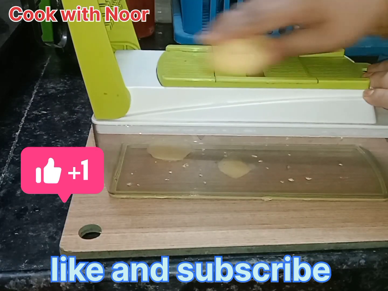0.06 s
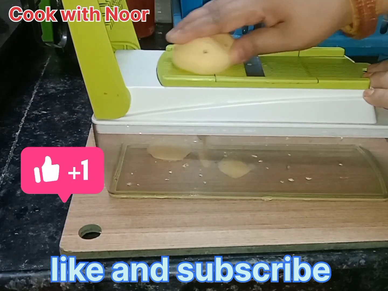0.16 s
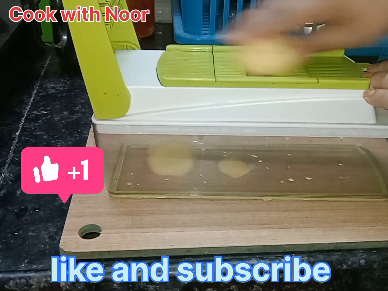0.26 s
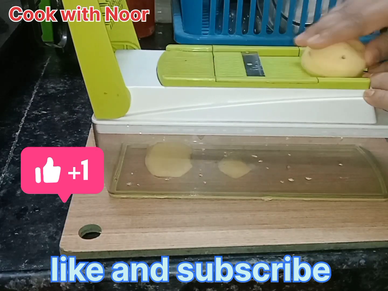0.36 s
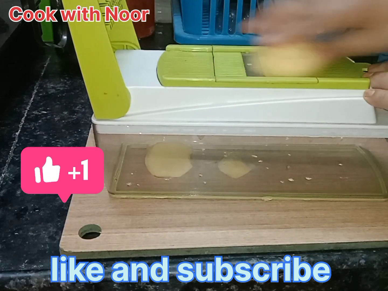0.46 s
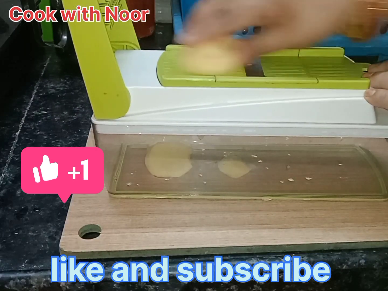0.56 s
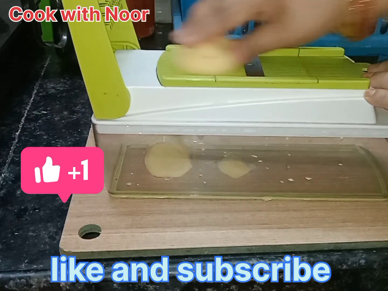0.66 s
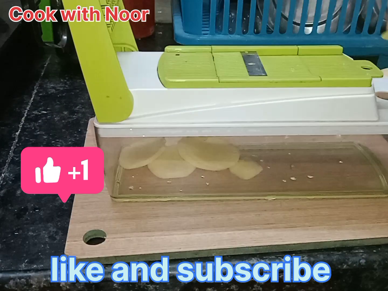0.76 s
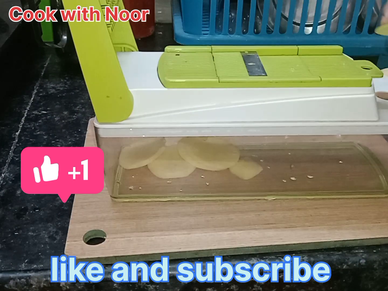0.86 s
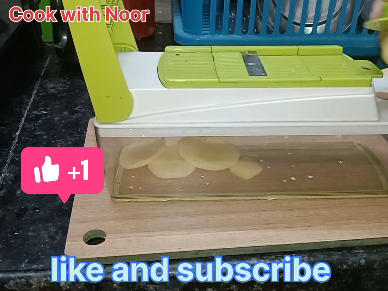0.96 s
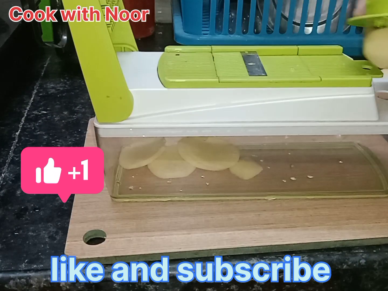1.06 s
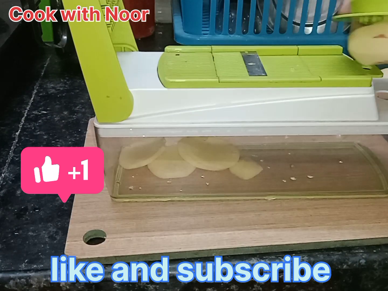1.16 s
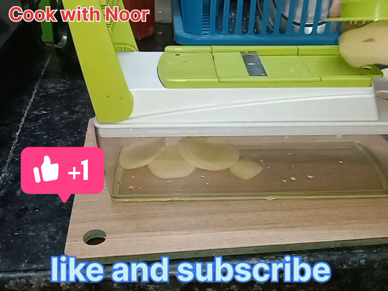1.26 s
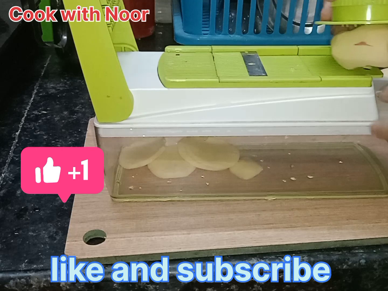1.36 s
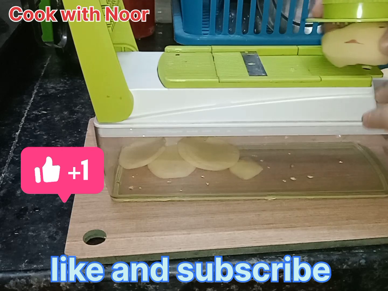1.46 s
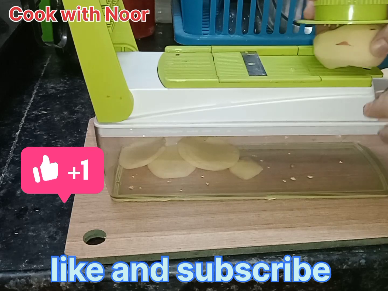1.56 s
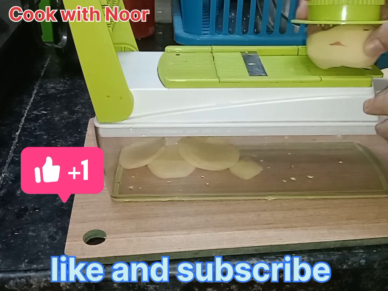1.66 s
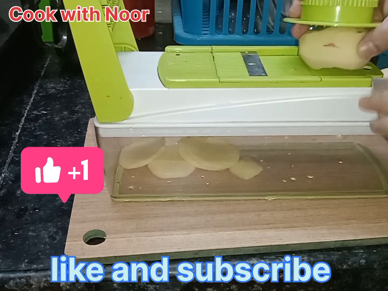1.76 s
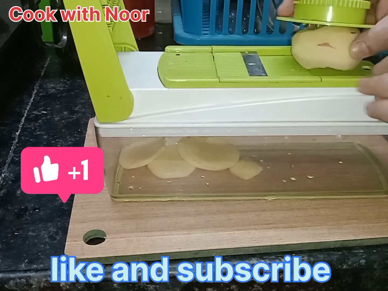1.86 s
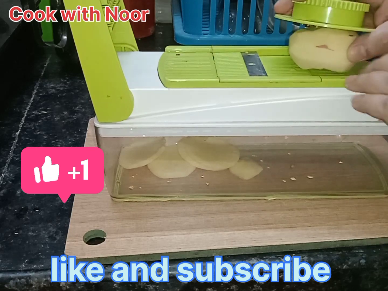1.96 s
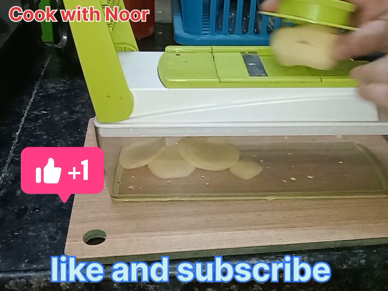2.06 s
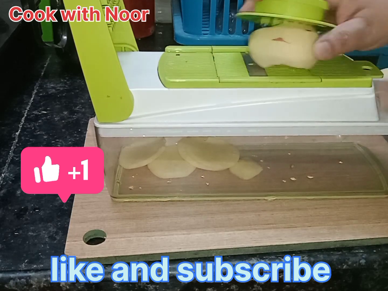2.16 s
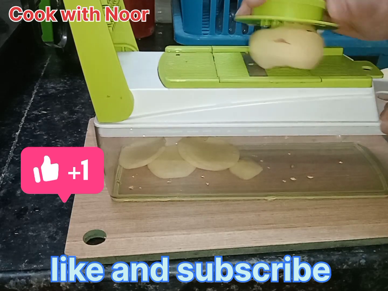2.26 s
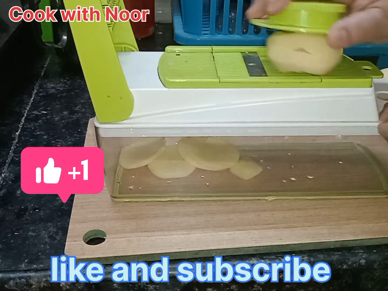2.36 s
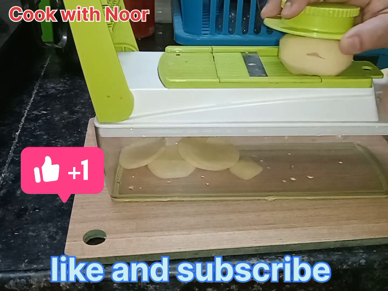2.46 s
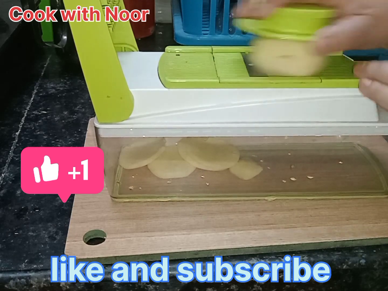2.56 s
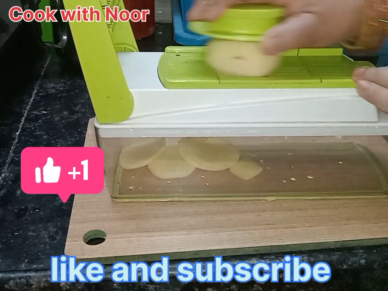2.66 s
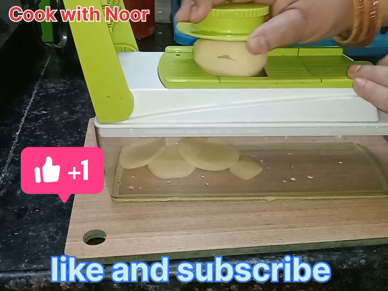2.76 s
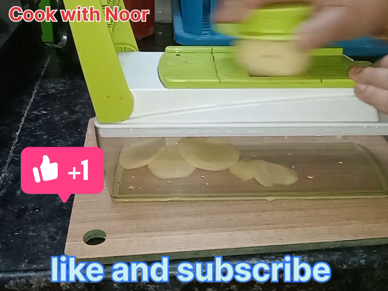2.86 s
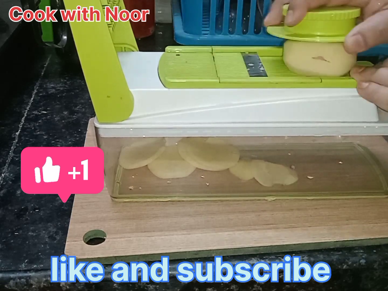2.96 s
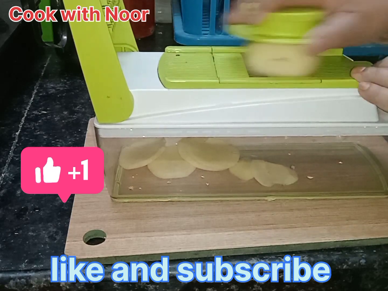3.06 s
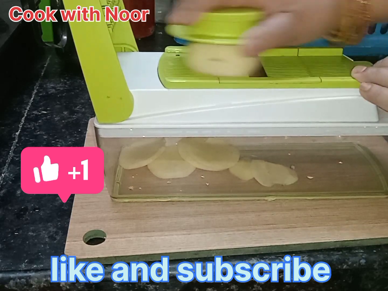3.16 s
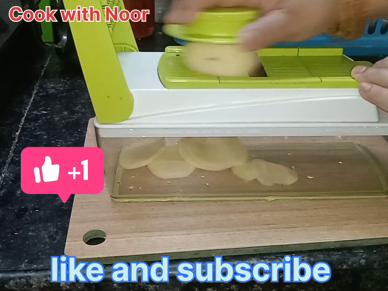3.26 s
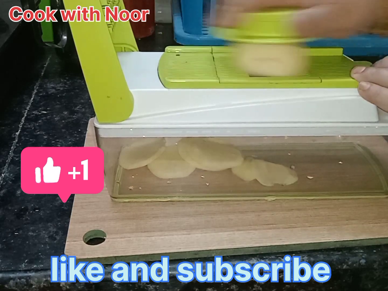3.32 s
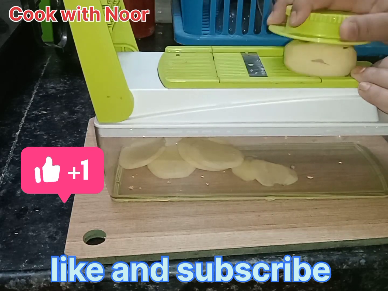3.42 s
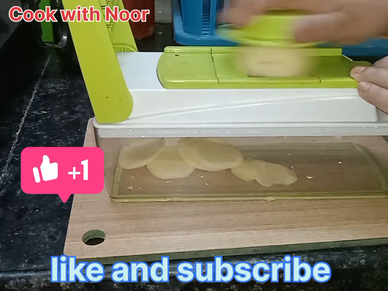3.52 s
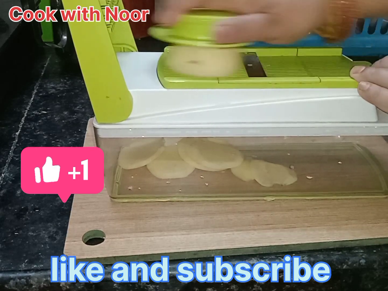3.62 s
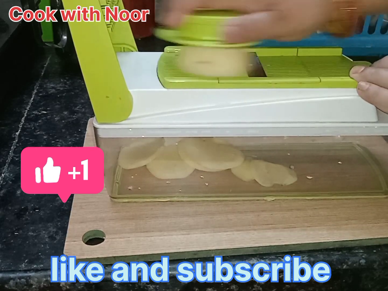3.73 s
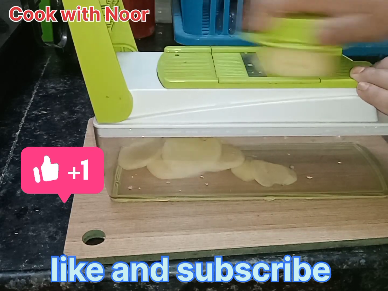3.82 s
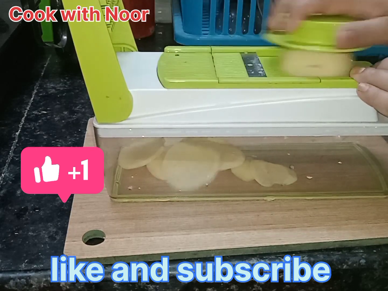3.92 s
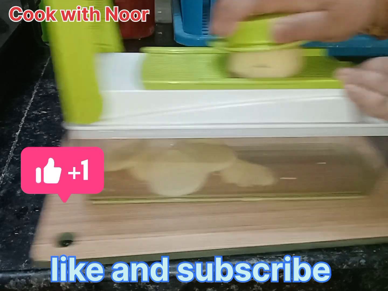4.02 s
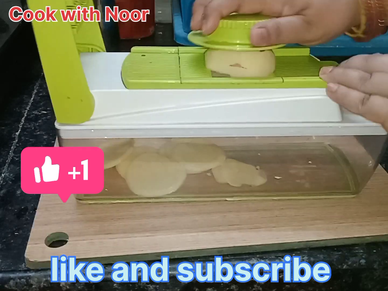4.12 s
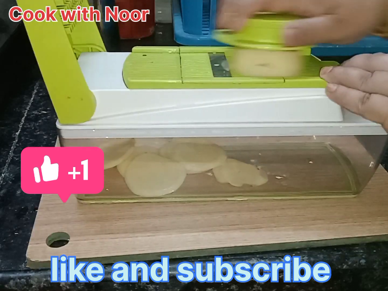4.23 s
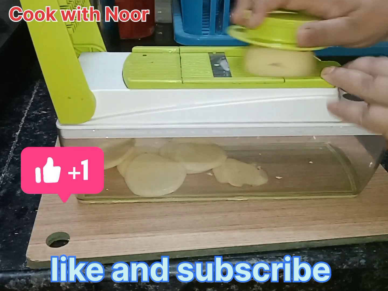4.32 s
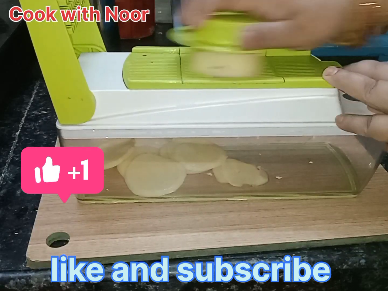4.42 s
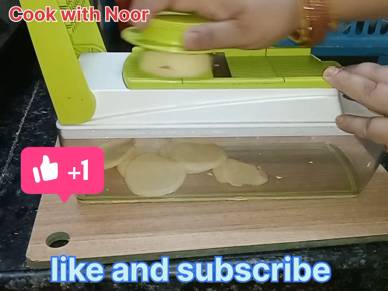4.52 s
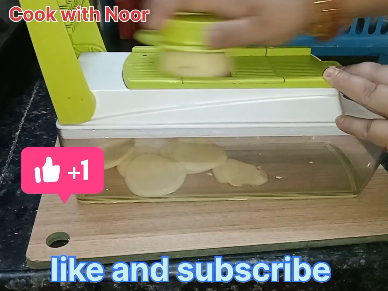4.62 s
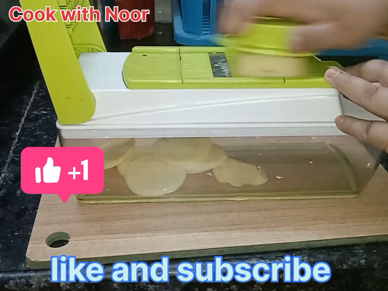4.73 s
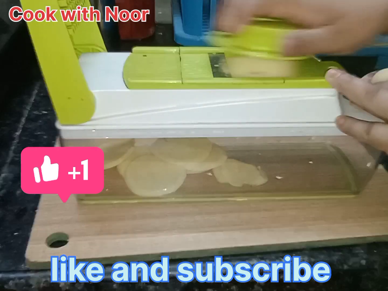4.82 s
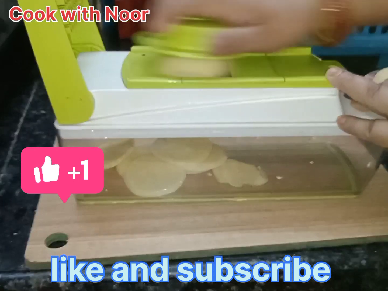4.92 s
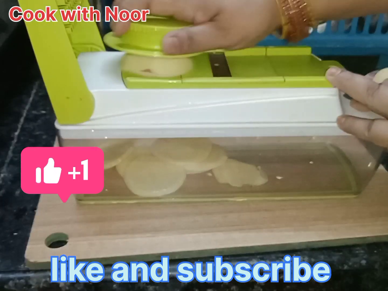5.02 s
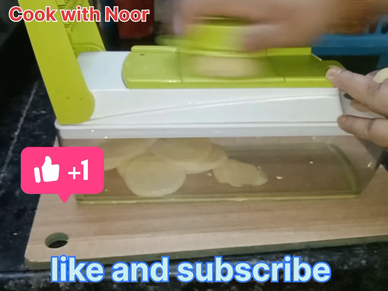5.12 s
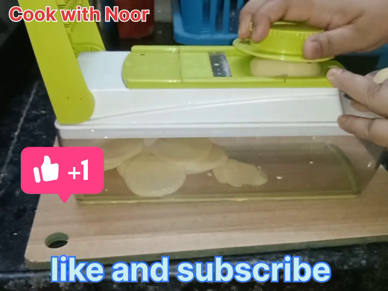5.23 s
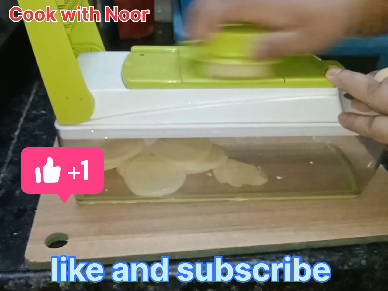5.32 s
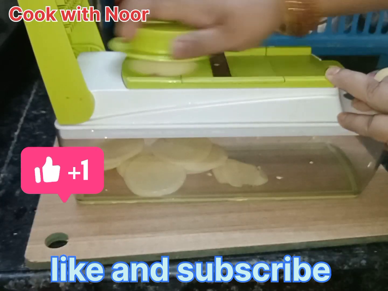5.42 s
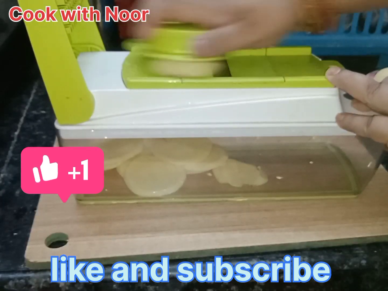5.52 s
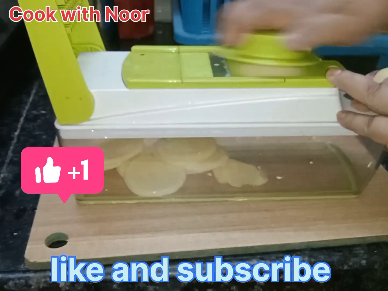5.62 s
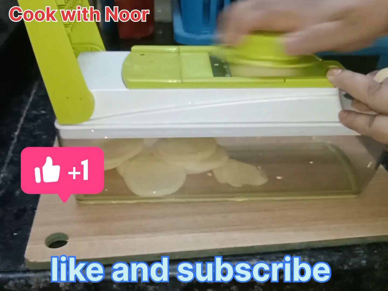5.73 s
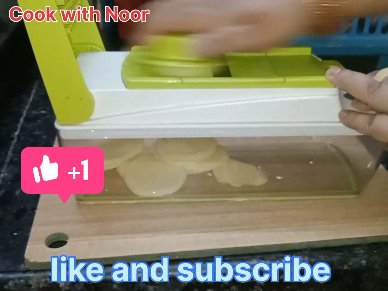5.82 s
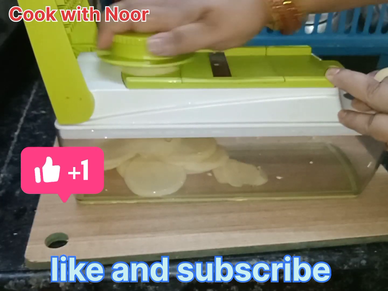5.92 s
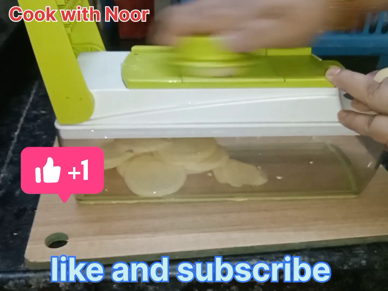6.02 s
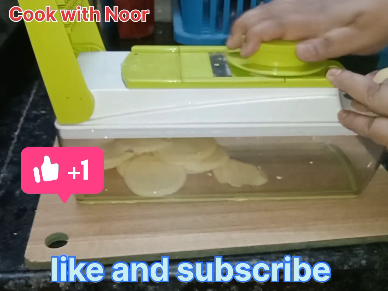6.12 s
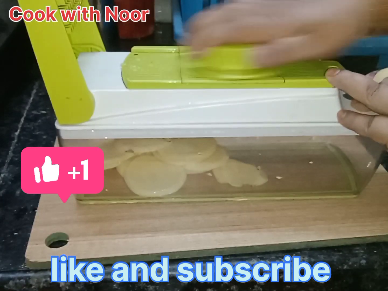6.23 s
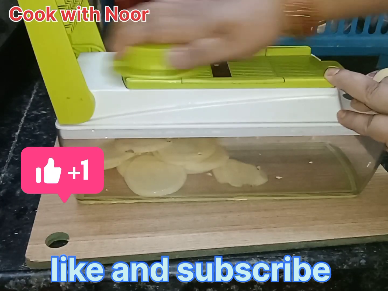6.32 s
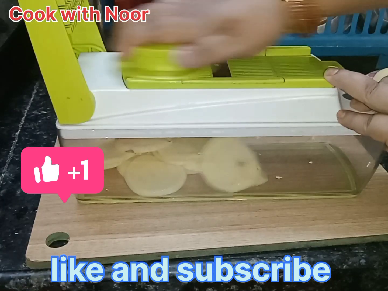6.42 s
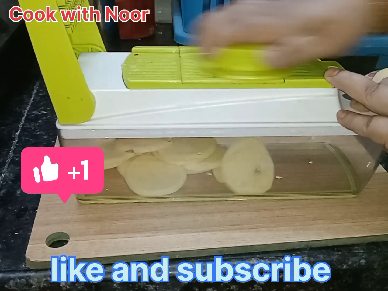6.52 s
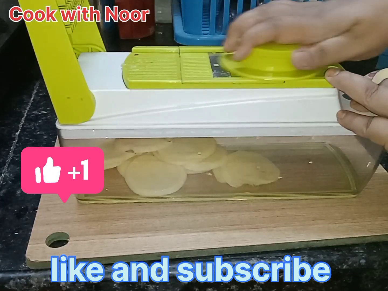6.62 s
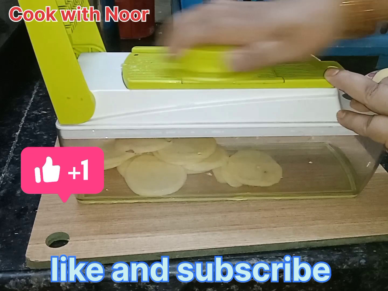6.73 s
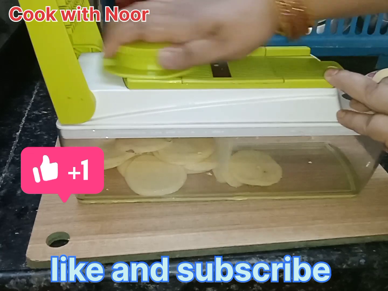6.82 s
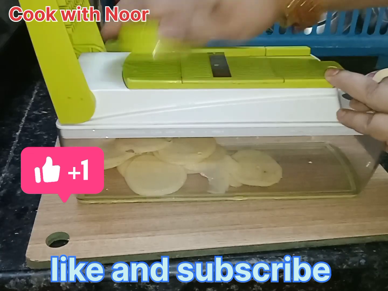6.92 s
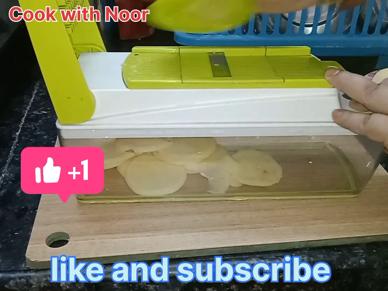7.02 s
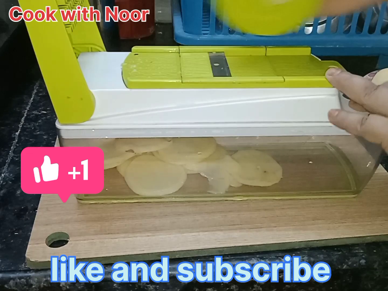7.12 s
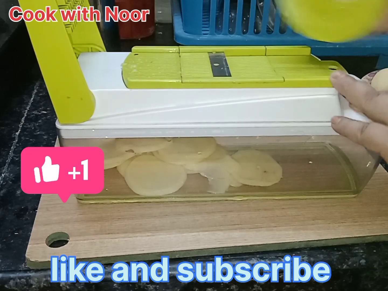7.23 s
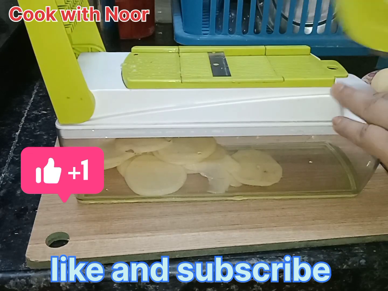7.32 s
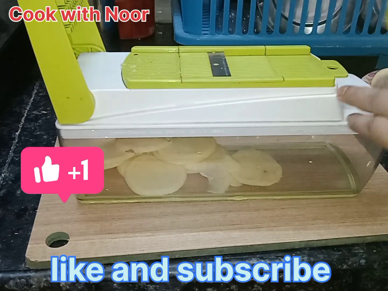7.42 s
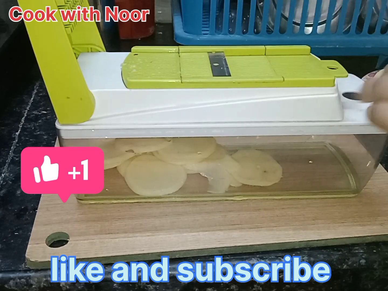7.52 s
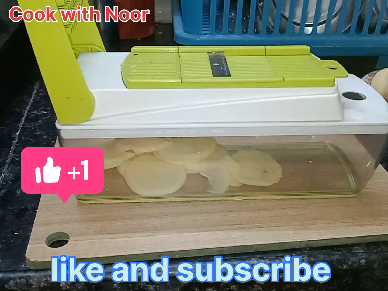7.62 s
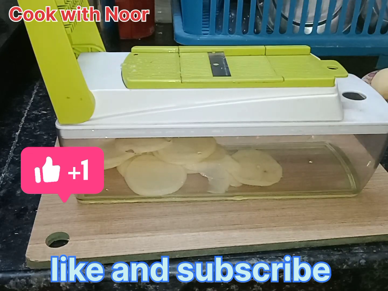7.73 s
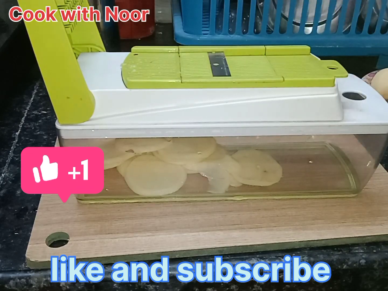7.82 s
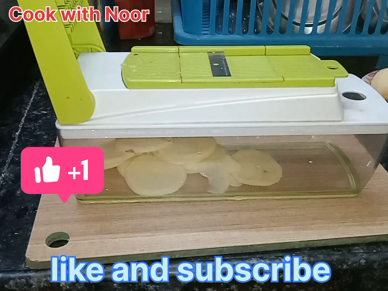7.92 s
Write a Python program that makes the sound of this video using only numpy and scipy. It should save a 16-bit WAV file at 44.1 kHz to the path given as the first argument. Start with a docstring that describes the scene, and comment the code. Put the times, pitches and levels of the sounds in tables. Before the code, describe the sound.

A raw potato is sliced on a plastic mandoline over a catch box, close up and almost mono in a small kitchen. Two quick wet, rasping cuts come at 0.3 and 0.75 seconds, among hollow thuds and sharp plastic clacks. At 0.8 seconds the sound stops dead, then quiet room tone fades in. A holder snaps lightly onto the potato at 1.1 seconds, and a bangle clinks, thin and high, at 1.5. From 2.7 to 6.9 seconds ten more cuts follow, a little over two a second, the first one softer. Each is a short low rasp with a juicy hiss; between them the potato slides back and bumps the frame with a hollow thud and clack. Bangles jingle lightly along with the strokes. After a final clack near 6.9 seconds, only dull room air and a faint appliance hum remain until about 8 seconds.

```python
"""A wet rasp and a hollow thud: raw potato on a plastic mandoline over a catch box, close up in a small
kitchen, almost mono. Each push tears fibres and bursts cells at the blade; each return slides back and
bumps the frame. Bangles clink on the wrist. After two quick bare-handed cuts the sound stops dead and
fades back in; a holder snaps onto the potato and ten more cuts follow, over a faint appliance hum."""
import sys
import numpy as np
from scipy import signal
from scipy.fft import rfft, irfft, next_fast_len
from scipy.io import wavfile

SR = 44100
rng = np.random.default_rng(int(sys.argv[2]) if len(sys.argv) > 2 else 0)


def log_audio(samples):
    """Write samples as a 16-bit WAV file to the path given in sys.argv[1]."""
    # one column per channel
    frames = np.atleast_2d(samples).T
    # limit to full scale, then quantise
    limited = np.clip(frames, -1, 1)
    pcm = np.round(limited * 32767).astype(np.int16)
    wavfile.write(sys.argv[1], SR, pcm)


N = 351918
TIME = np.arange(N) / SR

# pushes through the blade: t/s, length/s, rasp level/dB, hiss level/dB
CUTS = [(0.287, 0.044, -42, -51.5), (0.751, 0.0086, -36.5, -52.5), (2.69, 0.09, -50, -55.5),
        (3.176, .06, -45, -52), (3.631, 0.052, -41, -49), (4.137, 0.026, -40.5, -50.5),
        (4.525, 0.07, -48, -54.5), (4.959, 0.062, -42, -50), (5.421, 0.054, -42, -51.5),
        (5.866, 0.053, -42, -49), (6.345, 0.022, -41.5, -49), (6.81, 0.076, -44.5, -49.5)]
# lighter rubs and return slides, same columns
SLIDES = [(0.0, 0.017, -44, -72), (0.123, 0.0039, -35.5, -48.5), (0.581, 0.0051, -36, -49.5),
          (1.12, .42, -74.5, -76), (2.21, 0.024, -76, -73.5), (2.456, .01, -67, -71.5),
          (2.958, .005, -47.5, -62), (3.005, 0.011, -49, -61.5), (3.156, 0.03, -61, -70),
          (3.46, 0.021, -48.5, -58.5), (3.567, 0.047, -66, -77), (3.92, .035, -46, -56.5),
          (4.073, 0.035, -48.5, -56), (4.289, 0.02, -51.5, -72), (4.487, 0.018, -54.5, -75),
          (4.806, 0.017, -47.5, -57.5), (4.93, 0.023, -52.5, -90), (5.26, .035, -52, -60.5),
          (5.706, 0.013, -51, -56.5), (6.066, .018, -43.5, -57.5), (6.176, .035, -50.5, -57.5),
          (6.405, 0.062, -62, -63.5), (6.525, 0.049, -61, -62.5), (6.636, 0.0096, -39.5, -47),
          (6.72, 0.062, -64, -71)]
# envelope of each kind of stroke: creep/(dB/s), jump/dB, sag/(dB/s), rasp fall/(dB/s), hiss fall/(dB/s)
CUT_SHAPE = (550, 4.2, 37.6, 260, 330)
SLIDE_SHAPE = (820, 7.8, 23, 300, 420)
# spectra of the low rasp and the wet hiss: f/Hz, level/dB
RASP_SPECTRUM = [(40, -24.5), (110, -3.5), (170, 10.5), (330, 9.5), (520, 6), (1000, 0), (1500, -6),
                 (2200, -11.5), (3200, -16.5), (5000, -28.5), (9000, -56)]
HISS_SPECTRUM = [(800, -4), (2000, 5.5), (3500, 6), (4600, 0.5), (5600, 2.5), (8000, 2.5), (11000, -2),
                 (16000, -7.5)]
def slicing():
    """At the blade, close to the microphone: breaking fibres shake the deck and bursting cells hiss."""
    strokes = stroke_gains(CUTS, CUT_SHAPE) + stroke_gains(SLIDES, SLIDE_SHAPE)
    rasp_gain, hiss_gain = strokes * judder(per_s=160, depth_db=2.5)
    breaks = deck(grains(per_s=1800, spread_db=3.5), broad_db=1.5)
    rasp = rms_one(colour(breaks, RASP_SPECTRUM))
    hiss = rms_one(colour(grains(per_s=14000, spread_db=-1.0), HISS_SPECTRUM))
    wet = hiss + from_db(-2) * juice()
    return rasp_gain * rasp + hiss_gain * wet


def stroke_gains(strokes, shape, catch_s=0.0052):
    """Rasp and hiss gains: a stroke creeps up, catches, sags while the hand pushes, then dies away."""
    creep, jump_db, sag, *falls = np.abs(shape)
    gains = np.zeros((2, N))
    for start, length, *levels in strokes:
        near = slice(max(int((start - .15) * SR), 0), int((start + length + .4) * SR))
        t = TIME[near] - start
        rise_db = creep * np.minimum(t, 0) + jump_db * np.clip(t / catch_s, -1, 0)
        held_db = rise_db - sag * np.clip(t, 0, length)
        after_s = np.maximum(t - length, 0)
        gains[:, near] += from_db([db + held_db - fall * after_s for db, fall in zip(levels, falls)])
    return gains


# pockets of juice ringing as they burst: f/Hz, width/Hz, level/dB
JUICE_POCKETS = [(1720, 950, -0.5), (2700, 420, -8), (3490, 450, -0.5), (5830, 1400, -5), (6220, 1300, -2),
                 (6900, 280, 1), (7250, 123, 6.5)]
def juice():
    """Wet crackle: each size of pocket bursts in clumps of its own, so the colour keeps shifting."""
    crackle = np.zeros(N)
    for hz, width, db in JUICE_POCKETS:
        bursts = resonate(grains(per_s=500, spread_db=2.5), hz, width)
        crackle += from_db(db) * bursts * judder(per_s=45, depth_db=5)
    return rms_one(crackle)


# main resonances of the plastic deck: f/Hz, width/Hz, level/dB
DECK_RESONANCES = [(321, 35, 0), (474, 7.7, 1.5), (649, 85, -7), (805, 113, 0), (1050, 100, -4.5),
                   (1121, 27, -6.5), (1214, 77, 0.5), (1805, 20, -9.5), (1870, 77, -17.5), (2204, 67, -2),
                   (2790, 82, -4), (3820, 70, -25), (3760, 180, -3), (5660, 450, -16)]
def deck(force, broad_db):
    """The deck radiates a force through its resonances; a flat share stands for the many weaker ones."""
    return from_db(broad_db) * force + resonances(force, DECK_RESONANCES)


# potato and holder bump the slicer: t/s, thud level/dB, nominal f/Hz, clack level/dB, crack level/dB
KNOCKS = [(0.1251, -14.5, 289, -32.5, -23), (0.286, -25.5, 294, -29, -82), (0.447, -22.5, 293.6, -39, -79),
          (0.569, -22, 311, -36, -72), (0.5812, -19, 307, -49, -27), (0.752, -30, 320, -48, -65),
          (2.69, -39, 319, -38.5, -62), (2.958, -35.5, 333, -47, -43.5), (2.997, -31.5, 314, -45, -61),
          (3.018, -19.5, 295, -40, -53), (3.178, -31, 374, -35.5, -50), (3.363, -32.5, 302, -53, -68),
          (3.459, -27, 300, -40.5, -62), (3.483, -21.5, 289, -36.5, -71), (3.632, -24, 324, -28, -41),
          (3.772, -35.5, 276, -58, -60), (3.919, -28, 315, -46, -54), (3.952, -12.5, 294, -29.5, -43),
          (3.998, -44, 303, -59, -59), (4.073, -32, 330, -43, -51), (4.156, -22, 301, -39, -42),
          (4.288, -39.5, 282, -43, -49), (4.485, -41.5, 308, -46, -49), (4.678, -41.5, 274, -51, -72),
          (4.808, -28, 305, -38.5, -68), (4.838, -19.5, 283, -33.5, -47), (4.915, -40, 310, -36.5, -65),
          (4.939, -57, 377, -37, -56), (4.959, -28.5, 330, -28.5, -48), (5.26, -32, 302, -44.5, -55),
          (5.293, -14.5, 302, -34.5, -45.5), (5.419, -57, 310, -28.5, -42), (5.638, -42.5, 296, -57, -62),
          (5.713, -26, 301, -41, -49.5), (5.739, -19, 315.5, -31.5, -41), (5.866, -31, 314, -44, -61),
          (6.071, -32.5, 292, -43, -42), (6.166, -36.5, 304, -60, -51), (6.203, -33, 330, -33, -38),
          (6.401, -32.5, 304, -35.5, -38), (6.637, -30.5, 312, -28, -34), (6.786, -40, 340, -35, -55),
          (6.829, -53, 300, -33.5, -40), (6.864, -33, 290, -23.5, -37)]
# low modes of the frame and of the catch box below it: f/Hz, level/dB, t60/s
FRAME_MODES = [(300, -23, 0.082), (368, -18.5, 0.26)]
BOX_MODES = [(172, -5, 0.086), (198.6, 0.5, 0.17)]
def thuds():
    """The soft potato bumps the frame and the box booms; so small a body radiates little bass."""
    times, thud_db, pitch_hz, _, crack_db = np.transpose(KNOCKS)
    swell_s = 0.0049 * 2 ** ((-51 - crack_db) / 72)   # harder contacts swell quicker
    t = TIME[:SR // 8]
    flex = np.zeros(N + len(t))
    for start, db, hz, swell in zip((times * SR).astype(int), thud_db, pitch_hz, swell_s):
        # the potato damps the frame and, as its weight bears on it, pulls the pitch down
        sagging_hz = hz * (0.82 + 0.27 * np.exp(-t / 0.022))
        envelope = from_db(db) * t / swell * np.exp(1 - t / swell)
        flex[start:start + len(t)] += envelope * np.sin(2 * np.pi * np.cumsum(sagging_hz) / SR)
    frame = from_db(2.0) * strike(times, thud_db, FRAME_MODES, scatter_db=-4.5)
    boom_db = thud_db - 10.5 - 0.72 * times   # the box booms less as slices pile up in it
    box = strike(times + 0.0034, boom_db, BOX_MODES, scatter_db=5.0)
    body = cut_off(from_db(-3.0) * flex[:N] + frame + box, 610, "low", order=3)
    return cut_off(body, 192, "high", order=3)


# spectra of the hard part of each knock: f/Hz, level/dB
CLACK_SPECTRUM = [(40, -27), (150, 0), (400, 21.5), (800, 19), (1200, 8.5), (1600, -12.5), (2200, -11),
                  (4000, -40)]
CRACK_SPECTRUM = [(900, -3), (1900, 12.5), (3500, 2.5), (5500, 0.5), (8000, -5.5), (11000, -17.5),
                  (16000, -20)]
def clacks():
    """Harder contacts chatter on the deck for a few milliseconds and open with a bright crack."""
    times, *_, clack_db, crack_db = np.transpose(KNOCKS)
    chatter = noise(CLACK_SPECTRUM) * dying(times, clack_db, decay_s=0.0044)
    crack = noise(CRACK_SPECTRUM) * dying(times + 0.001207, crack_db, decay_s=0.0037)
    # the first touch is a clean impulse with a dull part and a sharp part
    dull = from_db(12.0) * cut_off(clicks(times + 0.001005, clack_db), 1000, "low", order=2)
    sharp = from_db(1.0) * cut_off(clicks(times + 0.00107, crack_db), 6500, "low", order=2)
    force = from_db(-4.0) * cut_off(chatter, 2770, "low", order=4) + from_db(-2.0) * crack + dull + sharp
    return deck(cut_off(force, 140, "high", order=2), broad_db=1.0)


# share of the hollow ring in the contact sound: t/s, share/0-1
RING_SHARE = [(4.4, 0.5), (5.4, 0.63), (6.4, 0.64)]
# slight loss of body in that share: f/Hz, level/dB
THINNING_EQ = [(300, -1.5), (500, -0.5), (700, -2), (900, 0), (1300, 2), (2600, -1)]
# hollow plastic resonances: f/Hz, width/Hz, level/dB
HOLLOW_RESONANCES = [(843, 62, 0), (1024, 92, 0.5), (2090, 200, 3.5), (3560, 110, -11)]
def hollow_ring(contact):
    """A hollow plastic ring on all cuts and knocks, slightly stronger and thinner late on."""
    share = np.interp(TIME, *np.transpose(RING_SHARE))
    ringing = colour(contact, THINNING_EQ) + resonances(contact, HOLLOW_RESONANCES)
    return (1 - share) * contact + share * ringing


# bangles touch, holder prongs snap into the potato, loose bangles jostle: t/s, level/dB
CLINKS = [(0.8796, -62.5), (1.391, -70), (1.5167, -43)]
SNAPS = [(1.067, -34.5), (1.074, -43), (1.09, -38)]
JINGLES = [(0.8493, -52), (3.08, -59), (3.5319, -64), (3.566, -49), (4.0106, -48.5), (4.8774, -54),
           (4.933, -50), (5.3348, -57), (5.3734, -50), (5.803, -54), (6.257, -52), (6.731, -52.5)]
# ringing of one bangle and of the holder: f/Hz, level/dB, t60/s
BANGLE_MODES = [(4500, -16, 0.14), (7700, -9, 0.17), (7300, -23, 0.067), (8780, 3, 0.097), (12340, 1, 0.11),
                (14400, -11, .14)]
HOLDER_MODES = [(3480, -6, 0.028), (4180, -11, 0.024), (5750, -2, 0.045), (6000, -15, 0.025),
                (6930, -1, 0.043), (8450, 1, 0.059), (9200, 3.5, 0.04), (12100, -5, 0.015),
                (13300, -4, .02), (14940, -8, 0.023)]
# pitches of the loose bangles: f/Hz
JINGLE_HZ = [5600, 6480, 6500, 7400, 9000, 9700, 10560, 12200, 12400, 13200]
def bangles_and_holder():
    """At the hand, with little room on them: struck bangles ring thin and high, the holder snaps."""
    clinks = strike(*np.transpose(CLINKS), BANGLE_MODES, scatter_db=1.5)
    snaps = strike(*np.transpose(SNAPS), HOLDER_MODES, scatter_db=1.5)
    times, db = np.transpose(JINGLES)
    loose_modes = [(hz, -4 * np.log2(hz / JINGLE_HZ[0]), .07) for hz in JINGLE_HZ]
    rebound_s = times + rng.uniform(0.018, 0.03, len(times))
    jingles = strike(times, db - 3, loose_modes, scatter_db=6)
    jingles += strike(rebound_s, db - 8, loose_modes, scatter_db=6)
    # clinks, snaps and jingles open with a tiny tick
    times, db = np.transpose([*CLINKS, *SNAPS, *JINGLES])
    ticks = cut_off(rng.standard_normal(N) * dying(times, db, decay_s=0.0014), 8100, "high", order=3)
    return from_db(-5.5) * clinks + from_db(-16.5) * snaps + from_db(-11.5) * jingles + ticks


def squeak(at_s=6.55, half_length_s=.018):
    """Once, on the holder's way back, wet plastic rubs on plastic in one narrow resonance."""
    envelope = from_db(-59) * np.exp(-((TIME - at_s) / half_length_s) ** 2)
    return envelope * rms_one(resonate(rng.standard_normal(N), hz=3600, width_hz=180))


def sliding():
    """Faint friction under the ten cuts: the wet potato never quite stops moving on the deck."""
    on_deck = np.interp(TIME, [2.6, 2.7, 4.4, 6.9, 7.05], [0, .5, 1, 1, 0])
    rubbing = deck(grains(per_s=2100, spread_db=3.5), broad_db=31.0)
    friction = cut_off(rms_one(colour(rubbing, HISS_SPECTRUM)), 8600, "low", order=2)
    return from_db(-73.5) * on_deck * judder(per_s=25, depth_db=1.5) * friction


def kitchen(x, first_echo_s, build_s, t60_s=0.32):
    """Dense reflections from nearby tiles and counter, dying evenly at all pitches."""
    t = TIME[:SR // 2]
    envelope = from_db(-60 * t / t60_s) * np.clip((t - first_echo_s) / build_s, 0, 1)
    echoes = rng.standard_normal(len(t)) * envelope
    return signal.fftconvolve(x, echoes / np.linalg.norm(echoes))[:N]


# appliances in the background: f/Hz, width/Hz, level/dB
APPLIANCE_HUMS = [(127.5, 6.1, -95), (218.6, 9.6, -79), (1841, 48, -80.5)]
# spectrum of the room air: f/Hz, level/dB
AIR_SPECTRUM = [(25, -16.5), (50, -22), (80, -3.5), (125, 6.5), (220, 7), (340, -1.5), (800, -5),
                (1400, -9.5), (2200, -15.5), (3500, -22), (5000, -25.5), (9000, -30), (16000, -33.5)]
# the air is a little louder early on: t/s, level/dB
AIR_LEVEL = [(0, -63), (1.4, -63.5), (2.3, -64.5), (7.5, -66)]
def room_tone():
    """Behind it all, dull kitchen air and the narrow hums of appliances."""
    hums = sum(from_db(db) * rms_one(resonate(rng.standard_normal(N), hz, width))
               for hz, width, db in APPLIANCE_HUMS)
    return from_db(np.interp(TIME, *np.transpose(AIR_LEVEL))) * noise(AIR_SPECTRUM) + hums


def from_db(db):
    """Decibels to gain."""
    return 10 ** (np.asarray(db) / 20)


def rms_one(x):
    """Scale to rms 1."""
    return x / np.sqrt(np.mean(x ** 2) + 1e-20)


def colour(x, spectrum):
    """Filter by a smooth curve of f/Hz, level/dB."""
    hz, db = np.transpose(spectrum)
    size = next_fast_len(x.shape[-1] + SR // 10)
    bin_hz = np.maximum(np.arange(size // 2 + 1) * SR / size, 1)
    gain = from_db(np.interp(np.log(bin_hz), np.log(hz), db))
    return irfft(rfft(x, size) * gain, size)[..., :x.shape[-1]]


def noise(spectrum):
    """Coloured noise at rms 1."""
    return rms_one(colour(rng.standard_normal(N), spectrum))


def cut_off(x, hz, kind, order):
    """Butterworth low- or high-pass."""
    return signal.sosfilt(signal.butter(order, hz, kind, fs=SR, output="sos"), x)


def resonate(x, hz, width_hz):
    """One resonance with gain 1 at its peak."""
    r = np.exp(-np.pi * width_hz / SR)
    feedback = [1, -2 * r * np.cos(2 * np.pi * hz / SR), r * r]
    return signal.lfilter(np.array([1, 0, -1]) * (1 - r * r) / 2, feedback, x + 1e-18)


def resonances(x, peaks):
    """Several resonances driven side by side."""
    return sum(from_db(db) * resonate(x, hz, width) for hz, width, db in peaks)


def clicks(times, db):
    """One impulse per event."""
    out = np.zeros(N)
    out[np.clip(np.round(times * SR).astype(int), 0, N - 1)] = from_db(db)
    return out


def strike(times, db, modes, scatter_db):
    """Each blow sets every mode ringing with a strength of its own."""
    out = np.zeros(N)
    chance = rng.standard_normal((len(times), len(modes)))
    for k, (hz, mode_db, t60) in enumerate(modes):
        r, w = from_db(-60 / (t60 * SR)), 2 * np.pi * hz / SR
        blows = clicks(times, db + mode_db + scatter_db * chance[:, k])
        out += signal.lfilter([0, np.sin(w)], [1, -2 * r * np.cos(w), r * r], blows + 1e-18)
    return out


def dying(times, db, decay_s):
    """An envelope that jumps at each event and falls exponentially."""
    return signal.lfilter([1], [1, -np.exp(-1 / (decay_s * SR))], clicks(times, db) + 1e-18)


def grains(per_s, spread_db):
    """Random tiny ruptures of unequal size."""
    sizes = from_db(spread_db * np.minimum(rng.exponential(1, N), 4))
    return rms_one((rng.random(N) < per_s / SR) * sizes * rng.choice([-1, 1], N))


def judder(per_s, depth_db):
    """Uneven stick and slip: a gain that wanders quickly."""
    steps = rng.standard_normal(N // 10)
    return rms_one(from_db(depth_db * np.interp(TIME * per_s, np.arange(len(steps)), steps)))


def scene():
    """The slicer close and centred, the kitchen behind; only the high reflections have some width."""
    cuts = hollow_ring(slicing() + sliding()) + squeak()
    bumps = thuds()
    clatter = hollow_ring(clacks())
    rings = bangles_and_holder()
    to_room = from_db(-10.5) * (cuts + bumps) + from_db(-5.0) * clatter + from_db(-17.5) * rings
    room = kitchen(to_room, first_echo_s=0.0092, build_s=0.0015)
    mid = cuts + bumps + clatter + rings + room + room_tone()
    side_echoes = kitchen(cuts + rings, first_echo_s=.001, build_s=.002)
    side = from_db(-21) * cut_off(side_echoes, 4500, "high", order=6)
    return np.array([mid + side, mid - side])


# treble response of the microphone, and the duller top of the first two cuts: f/Hz, level/dB
MICROPHONE_EQ = [(4800, -1), (6500, 1), (7500, 1), (8400, -4), (11000, -7), (13600, -5), (14900, 7),
                 (15700, 6)]
OPENING_EQ = [(5500, 2), (7500, 0), (10000, 1.5), (13500, 0.5), (15000, -41.5)]
def record(dry, stop_s=.777, cutoff_hz=15900):
    """At the microphone: the duller opening stops dead, the rest fades in, and the very top is cut."""
    sound = colour(dry, MICROPHONE_EQ)
    opening = colour(sound, OPENING_EQ) * np.clip((stop_s - TIME) / 0.0019, 0, 1)
    rest = sound * np.clip((TIME - stop_s - 0.03) / 0.26, 0, 1)
    return signal.sosfilt(signal.ellip(10, .1, 70, cutoff_hz, fs=SR, output="sos"), opening + rest)


dry = scene()
out = record(dry)
log_audio(out)
```